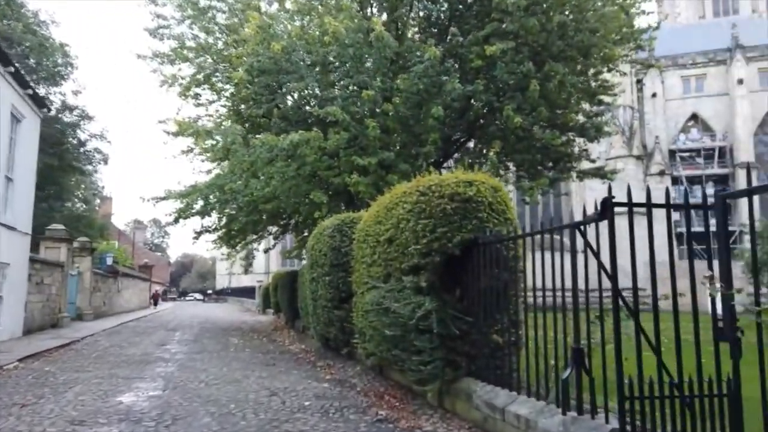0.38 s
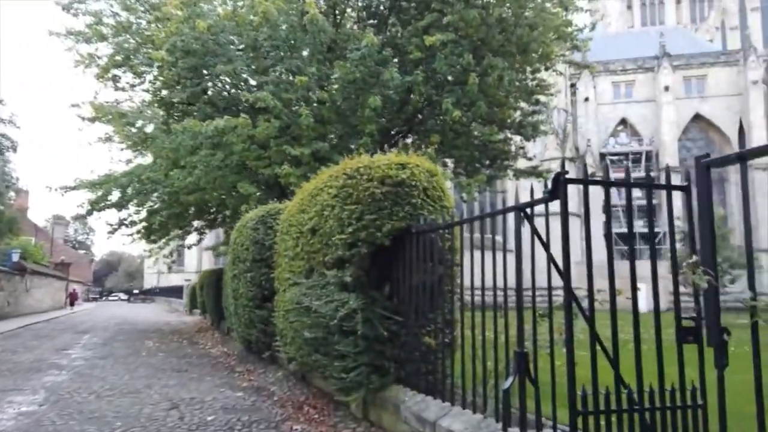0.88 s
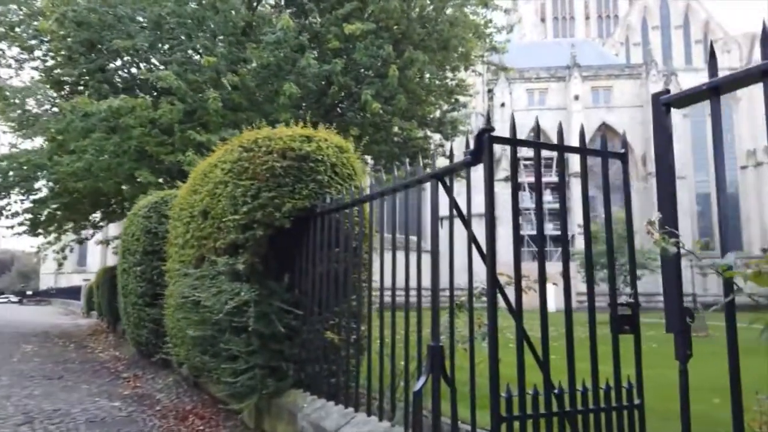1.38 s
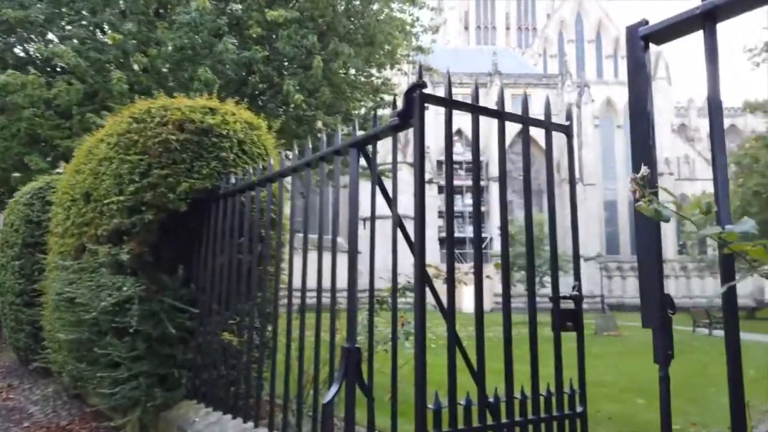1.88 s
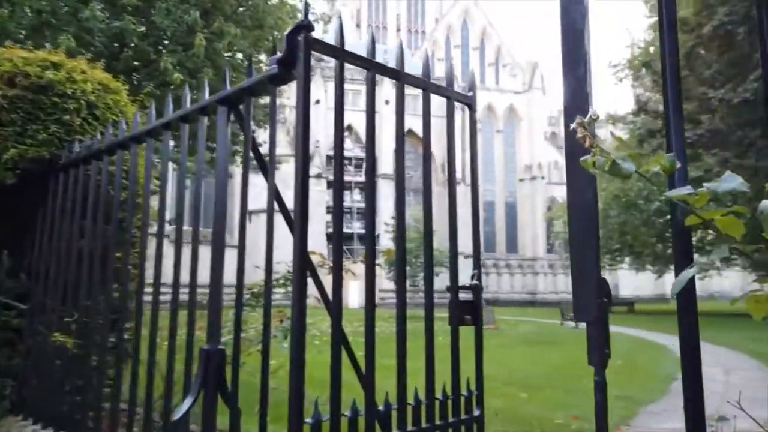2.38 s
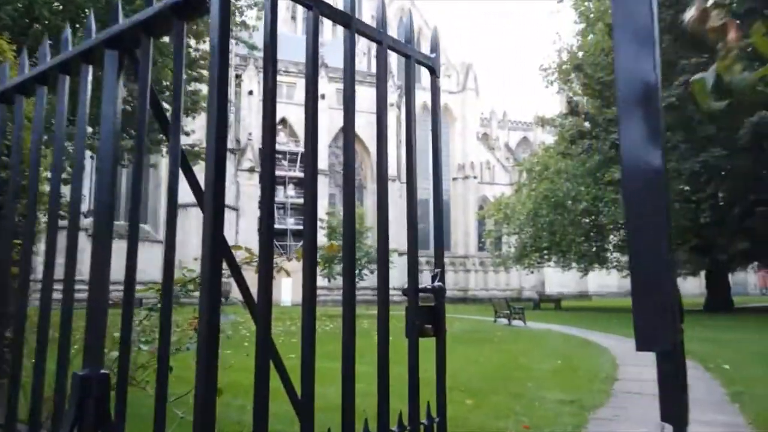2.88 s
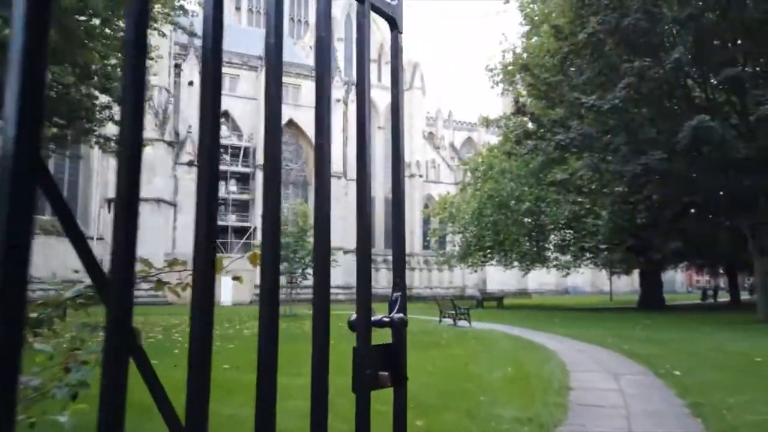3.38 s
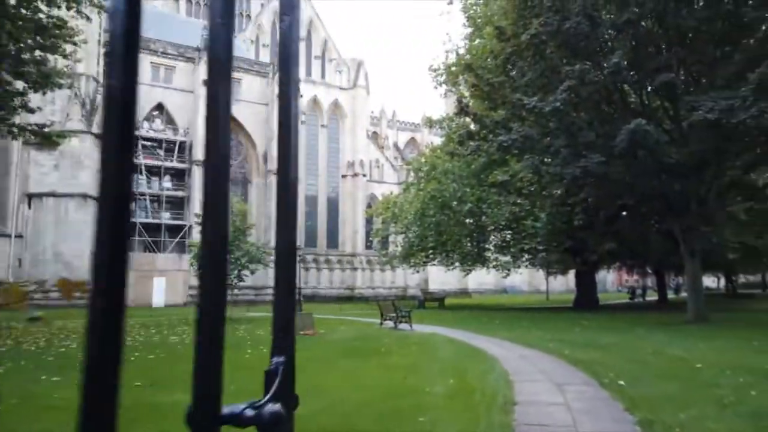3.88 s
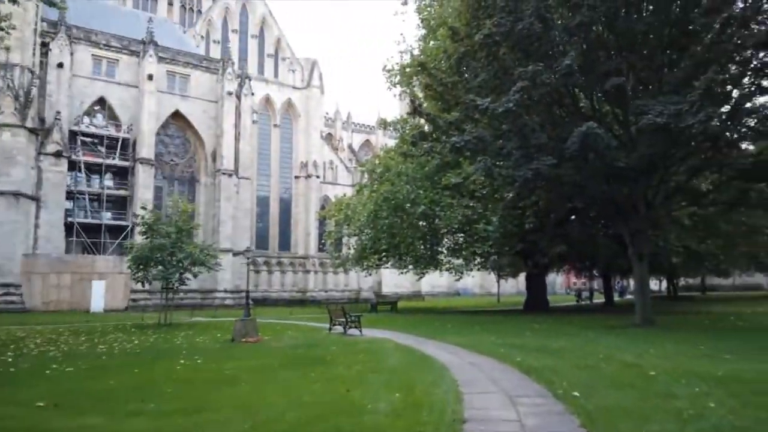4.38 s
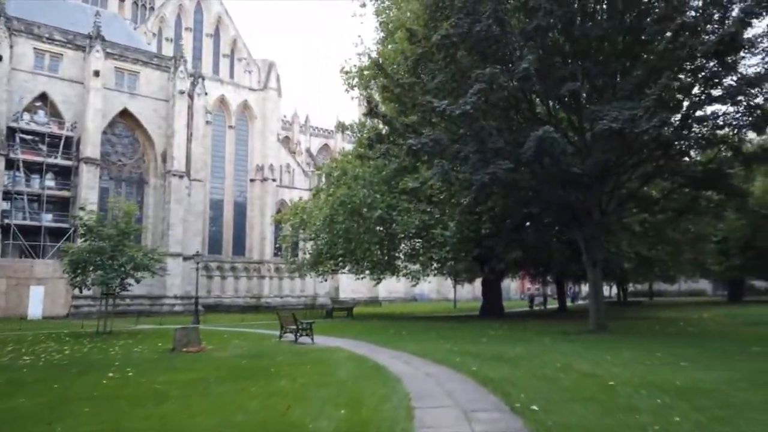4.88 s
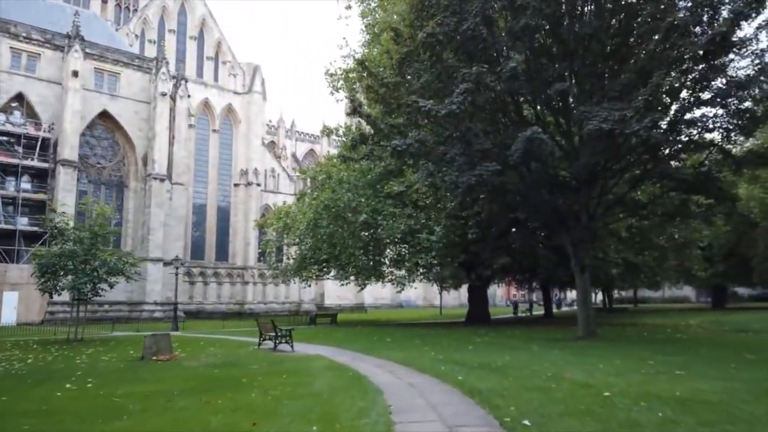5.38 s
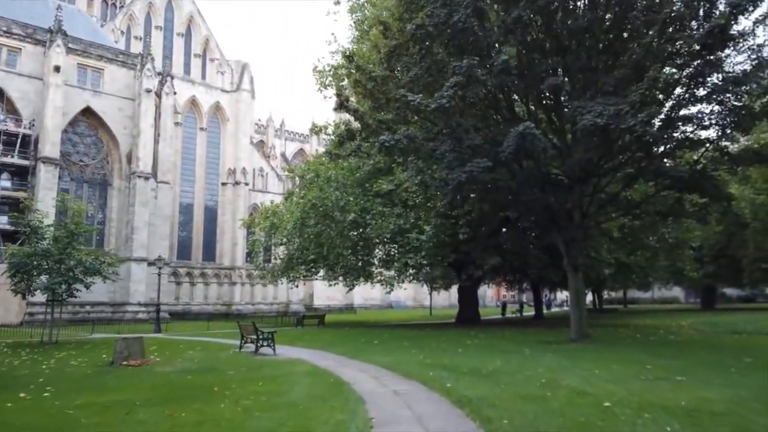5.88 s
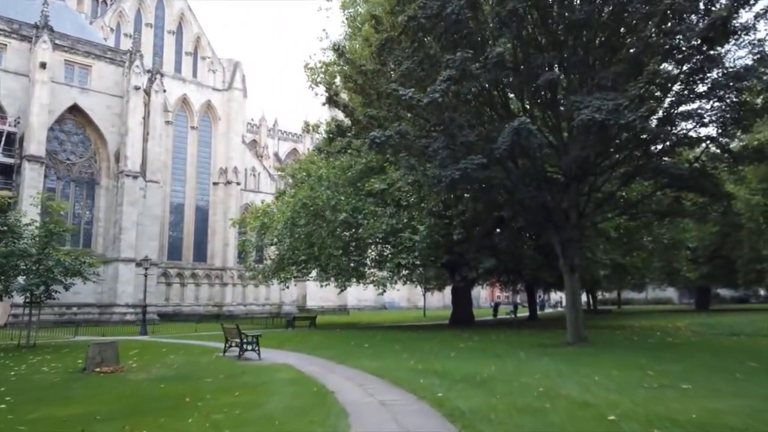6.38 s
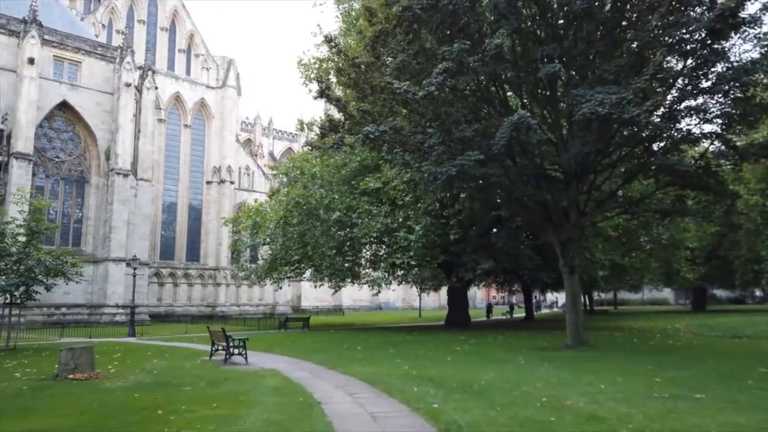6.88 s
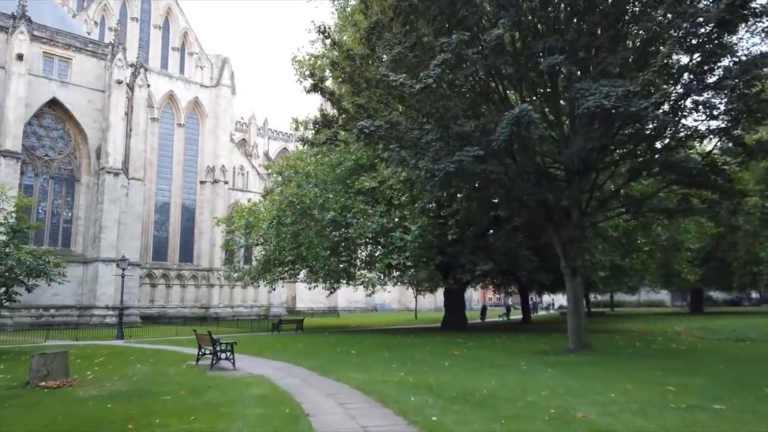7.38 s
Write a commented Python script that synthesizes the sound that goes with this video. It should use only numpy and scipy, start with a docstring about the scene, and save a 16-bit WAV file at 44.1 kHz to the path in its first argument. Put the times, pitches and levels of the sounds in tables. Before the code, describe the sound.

An open-air walk over cobbles and paving, heard from a small carried stereo microphone. Distant traffic and airy leaves lie underneath as soft broad noise, with a very faint low hum on the left. From 0 s wind puffs rumble deep and close, strongest around 0.1, 0.6 and 1 s. Small knocks and grit come at 0.1 s, then a loud dry double clack of the sole at 0.63-0.66 s with pebbly crunch, and a cluster of weaker knocks near 1.1 s. Lighter taps and scuffs follow around 1.65, 1.9, 2.4, 3.0 and 3.6 s while gusts weaken, dying near 4 s. A crisp gritty step falls at 4.3 s, leaves rustle softly around 4.8 s, and faint steps come at 5.4, 5.95 and 6.6 s. One low thump of air swings at 6.37 s. Traffic swells from 6.8 s, peaking about 7.2 s with the last soft footfall.

```python
"""Someone walks over cobbles and paving slabs carrying a small stereo microphone.
Shaped noise makes far traffic and leaves throughout, with a faint narrow hum on the left.
At first gusts rumble on the microphone and decaying modes ring the hardest knocks of the soles on stone.
Lighter steps follow, with scuffs built from random grains; the gusts die down near four seconds.
Then leaves rustle softly, one low swing thumps in the calm, and traffic swells as the last sole lands."""
import sys
import numpy as np
from scipy import signal
from scipy.fft import rfft, irfft
from scipy.io import wavfile
from scipy.ndimage import uniform_filter1d

SR = 44100
rng = np.random.default_rng(int(sys.argv[2]) if len(sys.argv) > 2 else 0)


def invert_db(level):
    """Linear amplitude ratio for a level in decibels (20 dB per decade), elementwise."""
    return 10 ** (np.asarray(level, dtype=float) / 20)


def int16_out(signal):
    """Quantize to a 16-bit WAV file."""
    q = np.round(np.clip(np.atleast_2d(signal).T, -1, 1) * 32767)
    wavfile.write(sys.argv[1], SR, q.astype(np.int16))


N = 331191


def rms_one(x):
    """Scale to rms 1."""
    return x / np.sqrt(np.mean(x ** 2) + 1e-20)


def in_time(rows):
    """Columns of a time table, drawn as straight lines with one value a sample."""
    s, *columns = np.transpose(rows)
    return [np.interp(np.arange(N) / SR, s, c) for c in columns]


def at_hz(points, hz):
    """Read a spectrum on a log-frequency axis."""
    point_hz, value = np.transpose(points)
    return np.interp(np.log(hz), np.log(point_hz), value)


def drift(corner_hz):
    """Slow random wander of rms 1: noise through two equal low-pass poles, drawn every 40 samples."""
    r = np.exp(-80 * np.pi * corner_hz / SR)
    noise = rng.standard_normal(N // 40 + 2002)
    slow = signal.lfilter([1], [1, -2 * r, r * r], noise)[2000:]   # leaves out the filter's start
    return np.interp(np.arange(N) / 40, np.arange(len(slow)), rms_one(slow))


def coloured(x, spectrum):
    """Give white noise a spectrum; rms 1."""
    hz = np.maximum(np.arange(N // 2 + 1) * SR / N, 1)
    return rms_one(irfft(rfft(x) * invert_db(at_hz(spectrum, hz)), N))


def band(x, edges_hz):
    """Causal band-pass with steep edges."""
    sos = signal.butter(3, np.clip(edges_hz, 20, 19000), "band", fs=SR, output="sos")
    return signal.sosfilt(sos, x)


def pan(db):
    """Left and right gains for a level difference; positive leans left."""
    return np.array([invert_db(db / 2), invert_db(-db / 2)])


def swells(rows, rise_share, squareness=2.04):
    """Layer gains from rows of (peak s, fall s, dB, ..); squareness 2 is a bell, more is flat-topped."""
    t = np.arange(N) / SR
    levels = np.zeros((len(rows[0]) - 2, N))
    for s, fall, *layers_db in rows:
        near = slice(max(int((s - .4) * SR), 0), int((s + .4) * SR))
        width = np.where(t[near] < s, rise_share, 1) * max(fall, .002)
        shape = np.exp(-np.abs((t[near] - s) / width) ** squareness)
        levels[:, near] += invert_db(np.array(layers_db))[:, None] * shape
    return levels


def wide_noise():
    """White stereo noise whose left-right likeness depends on pitch, by the balance of mid and side."""
    # likeness of the two channels, 1 alike to -1 opposed: (frequency [Hz], likeness)
    likeness = [(60, -0.61), (180, 0.1), (550, 0.49), (1650, 0.53), (4970, 0.21), (15000, -0.55)]
    mid, side = rfft(rng.standard_normal((2, N)))
    hz = np.maximum(np.arange(len(mid)) * SR / N, 1)
    alike = np.clip(at_hz(likeness, hz), -1, 1)
    return irfft(np.sqrt(1 + alike) * mid + np.sqrt(1 - alike) * side * [[1], [-1]], N)


def surroundings():
    """Far traffic and leaves breathe slowly as broad noise; a narrow band of noise hums on the left."""
    # far traffic, hidden by the hedge and walls by turns: (time [s], level [dB])
    air = [(0.0, -48), (0.2, -50), (0.98, -48.5), (1.29, -54), (3.0, -55.5), (4.9, -56), (5.1, -57),
           (6.3, -55), (6.8, -52.5), (7.0, -49), (7.19, -47), (7.51, -49.5)]
    # colour of the traffic: (frequency [Hz], relative density [dB per Hz])
    traffic_spectrum = [(71, -17), (120, 1), (189, -4), (254, -2.5), (332, -9.5), (575, -13), (997, -9.5),
                        (3500, -38), (4550, -41), (7700, -120)]
    # colour of the leaves: (frequency [Hz], relative density [dB per Hz])
    leaf_spectrum = [(1060, -9.5), (1800, -5.5), (2470, -10), (6740, -18), (11300, -21.5), (15100, -25.5),
                     (15600, -24)]
    hum_hz, hum_width_hz = 245.5, 32.3

    traffic_db, = in_time(air)
    rise_db = traffic_db + 55   # over quiet air at -55 dB
    traffic = coloured(wide_noise(), traffic_spectrum) * invert_db(traffic_db + 0.77 * drift(1.06))

    # leaves follow the traffic almost fully, the hum about a third of the way in dB
    leaves_db = -67 + 0.98 * rise_db + 1.5 * drift(14)
    leaves = coloured(wide_noise(), leaf_spectrum) * invert_db(leaves_db)
    hum_db = -66 + 0.36 * rise_db + 3 * drift(2)
    hum = band(rng.standard_normal(N), [hum_hz - hum_width_hz / 2, hum_hz + hum_width_hz / 2])
    hum = rms_one(hum) * invert_db(hum_db)
    return traffic * pan(0.91)[:, None] + leaves + hum * pan(14.0)[:, None]


def wind():
    """Turbulence pushes both ports nearly alike; wind and puffs set the size of each slow swing."""
    # colour of the deep rumble: (frequency [Hz], relative density [dB per Hz])
    rumble = [(12, -43), (20, -7.5), (49, 5), (64, 4), (90, -8.5), (120, -36), (200, -120)]
    # colour of the higher flutter: (frequency [Hz], relative density [dB per Hz])
    flutter = [(41, -25), (70, -1.5), (106, -6.5), (151, -16.5), (296, -33), (450, -43), (580, -46.5),
               (990, -120)]
    # strength of the wind between puffs, before the layer offsets: (time [s], level [dB])
    wind_strength = [(0.0, -46), (0.12, -29.5), (0.42, -35), (0.62, -21), (0.8, -30), (1.05, -26),
                     (1.3, -38), (1.65, -40.5), (1.9, -35.5), (2.15, -39.5), (2.65, -33), (3.0, -39.5),
                     (3.3, -33), (3.8, -37.5), (4.0, -52), (4.37, -49.5), (4.75, -58), (6.3, -57),
                     (6.75, -61.5), (7.34, -46), (7.51, -48)]
    # single puffs, strong and faint, as they drive the rumble:
    # (peak time [s], half length to 1/e [s], level [dB])
    puffs = [(0.06, 0.023, -19), (0.19, 0.017, -46), (0.35, 0.024, -29), (0.54, 0.036, -21),
             (0.66, 0.029, -26), (0.9, .1, -28), (1.05, 0.1, -23), (1.3, 0.032, -29.5), (1.53, 0.02, -26.5),
             (2.02, 0.019, -32.5), (2.35, 0.17, -37.5), (2.9, 0.038, -33.5), (3.15, 0.06, -33),
             (3.27, 0.024, -30), (3.47, 0.053, -26.5), (3.69, 0.058, -33), (3.97, 0.2, -41),
             (4.29, 0.053, -37)]

    wind_db, = in_time(wind_strength)
    steady = invert_db(wind_db + np.array([[2.5], [-1.5]]))              # rumble, flutter
    gusts = swells(puffs, 1) * invert_db(np.array([[0], [-18.5]]))       # puffs drive mostly the rumble
    out = 0
    for level, spectrum, evenness, side_db in zip(steady + gusts, (rumble, flutter), (.6, .4), (-28, -20)):
        mid, side = (coloured(rng.standard_normal(N), spectrum) for _ in "ms")
        # partly level out the noise's own swings
        swing = np.sqrt(uniform_filter1d(mid ** 2, size=2600) + 0.018)
        mid = rms_one(mid / swing ** evenness)
        out = out + level * (mid + invert_db(side_db) * side * [[1], [-1]])
    return out * pan(-0.25)[:, None]


def thump():
    """One lone puff of air gives a brief low swing in the calm: a cosine under a bell."""
    thump_s, thump_hz, bell_db = 6.366, 66.5, -33.5
    t = np.arange(N) / SR - thump_s
    bell = np.exp(-(t / .016) ** 2)
    return -invert_db(bell_db) * np.cos(2 * np.pi * thump_hz * (t + 0.0061)) * bell


def random_clicks(per_s, spread_db):
    """Two independent trains of chance clicks; spread_db makes some stronger."""
    strength = invert_db(spread_db * np.minimum(rng.exponential(1, (2, N)), 5))
    return (rng.random((2, N)) < per_s / SR) * strength


def grains(per_s, spread_db, spectrum, apart):
    """Dense clicks of either sign and one colour, partly different at the two ports."""
    clicks = random_clicks(per_s, spread_db)
    mid, side = coloured(clicks * rng.choice([-1, 1], (2, N)), spectrum)
    return rms_one(mid + apart * side * [[1], [-1]])


def ringing_grit(per_s, spread_db, cycles, apart):
    """Each coarse grain rings at one of twelve pitches, falling 60 dB in the given cycles."""
    low_hz, high_hz = 1930, 3800
    clicks = random_clicks(per_s, spread_db)
    dealt = rng.integers(0, 12, (2, N))
    out = 0
    for k, hz in enumerate(np.geomspace(low_hz, high_hz, 12)):
        r, w = invert_db(-60 * hz / (cycles * SR)), 2 * np.pi * hz / SR
        resonator = [1, -2 * r * np.cos(w), r * r]
        out = out + signal.lfilter([1, 0, -1], resonator, clicks * (dealt == k) + 1e-18)
    mid, side = band(out, [0.7 * low_hz, 1.2 * high_hz])
    return rms_one(mid + apart * side * [[1], [-1]])


def scuffs():
    """Pebbles rattle low, coarse grit crackles, fine sand hisses; one wide swell is a rustle of leaves."""
    # a landing sole crushes grit, which starts fast and dies slowly, levels before panning:
    # (peak time [s], fall to 1/e [s], pebbles [dB], coarse grit [dB], fine sand [dB])
    crunches = [(.065, 0.018, -81, -55, -60.5), (.14, .053, -60.5, -65, -74), (.585, 0.12, -48, -57, -65.5),
                (.671, 0.059, -50, -57.5, -62), (1.652, 0.021, -59, -58, -62.5),
                (2.371, 0.016, -51, -53.5, -80), (2.66, 0.027, -76, -63, -97),
                (3.63, 0.051, -58.5, -79, -82), (5.921, 0.011, -52.5, -54, -85)]
    # mostly a sole dragging over grit; the wide row at 4.8 s is a soft rustle of leaves.
    # All swell and fade evenly, levels before panning:
    # (peak time [s], half length to 1/e [s], pebbles [dB], coarse grit [dB], fine sand [dB])
    drags_and_rustle = [(1.099, 0.015, -50.5, -59.5, -59.5), (1.122, .096, -57, -63, -66),
                        (1.876, .025, -59.5, -60.5, -57), (2.54, 0.013, -70, -72, -68),
                        (2.995, .016, -58, -65.5, -63), (3.13, 0.059, -68, -64.5, -64),
                        (3.25, 0.062, -78, -67, -58), (3.34, 0.042, -85, -68, -68),
                        (3.715, 0.055, -77, -63.5, -64.5), (3.913, 0.018, -66, -66, -84),
                        (4.296, 0.055, -59.5, -54, -60), (4.85, 0.038, -61, -87, -96),
                        (4.8, 0.26, -68, -77, -74.5), (4.98, 0.038, -72, -69, -75),
                        (5.425, 0.034, -62.5, -73, -85), (5.95, 0.032, -59, -55.5, -75),
                        (5.968, .013, -51, -72, -85), (6.577, 0.04, -57, -66, -76),
                        (6.933, 0.025, -59, -62, -93)]
    # colour of the pebbles: (frequency [Hz], relative density [dB per Hz])
    pebble_spectrum = [(300, -3), (550, -2.5), (1000, 0), (1500, -1), (2400, -33.5)]
    # colour of the fine sand: (frequency [Hz], relative density [dB per Hz])
    sand_spectrum = [(3500, -13), (5200, -6), (7000, -12), (9800, -4), (12000, -12), (15500, -24.5)]

    levels = swells(crunches, rise_share=.28) + swells(drags_and_rustle, rise_share=1, squareness=3.1)
    pebbles = grains(2200, spread_db=3.0, spectrum=pebble_spectrum, apart=0.45) * pan(-6.0)[:, None]
    grit = ringing_grit(4500, spread_db=4.0, cycles=16.0, apart=0.87) * pan(-1.5)[:, None]
    sand = grains(6000, spread_db=0.0, spectrum=sand_spectrum, apart=1.06) * pan(2.8)[:, None]
    return levels[0] * pebbles + levels[1] * grit + levels[2] * sand


def struck(modes, t, contact_s):
    """Decaying modes set off by a soft push with time constant contact_s; peak 1."""
    ring = sum(-invert_db(db - 60 * t / t60) * np.sin(2 * np.pi * hz * t) for hz, db, t60 in modes)
    ring = ring * (1 - np.exp(-t / contact_s)) ** 3
    return ring / np.abs(ring).max()


def knocks():
    """Each contact rings the sole for a few cycles, ticks on the stone and rebounds once."""
    # sole meets stone, levels before panning:
    # (time [s], sharp knock peak [dB], dull thud peak [dB], bright tick [dB])
    contacts = [(0.092, -35, -30, -55), (0.123, -35, -34, -61), (0.135, -32, -57, -51),
                (0.575, -32, -39, -54), (0.626, -17, -25.5, -51), (0.664, -8.5, -22, -45),
                (0.897, -39.5, -60, -61), (1.017, -40, -42, -67), (1.043, -37, -33, -62),
                (1.071, -54, -55, -54), (1.086, -33, -31, -71), (1.093, -28.5, -38, -58),
                (1.106, -40, -27.5, -48.5), (1.21, -59, -58, -61), (1.24, -52, -58, -58),
                (1.649, -40, -27, -50.5), (1.744, -43.5, -47, -58), (1.768, -43, -54, -59),
                (1.894, -43, -42, -67), (2.355, -44, -45, -74), (2.37, -39.5, -40, -77),
                (2.415, -50, -43, -63), (2.464, -47, -55, -59), (2.658, -49, -47, -73),
                (2.963, -39, -41.5, -63), (3.107, -34.5, -63, -47), (3.619, -40, -37.5, -83),
                (4.245, -36.5, -35.5, -70), (4.318, -45, -44, -65), (4.824, -50, -44, -70),
                (4.847, -58, -41, -73), (5.102, -53, -67, -74), (5.175, -58, -64, -64),
                (5.273, -50, -69, -49), (5.389, -59, -48, -55), (5.415, -56, -41.5, -74),
                (5.92, -39, -62, -73), (5.977, -64, -38, -66), (6.562, -46, -46, -75),
                (6.598, -40, -49, -66), (7.171, -36.5, -33.5, -76)]
    # sharp modes of sole and slab: (frequency [Hz], relative level [dB], 60 dB decay time [s])
    sharp_modes = [(595, -1, 0.0071), (1044, 10, 0.0078), (1204, -5, 0.011), (1884, -11.5, 0.0093)]
    # dull modes of sole and slab: (frequency [Hz], relative level [dB], 60 dB decay time [s])
    dull_modes = [(429, 5.7, 0.018), (598, 12, 0.011), (758, 1.5, 0.017)]

    out = np.zeros((2, N + SR))
    t = np.arange(SR // 20) / SR
    sharp = struck(sharp_modes, t, contact_s=0.0012)
    dull = struck(dull_modes, t, contact_s=0.00038)
    for s, sharp_db, dull_db, tick_db in contacts:
        hit = invert_db(sharp_db) * sharp + invert_db(dull_db) * dull
        tick = rms_one(band(rng.standard_normal(len(t)), [1700, 12000]))
        hit += invert_db(tick_db) * tick * np.exp(-t / 0.0018)
        hit += invert_db(-15) * np.interp(t - .0105, t, hit, left=0)   # rebound
        late = np.interp(t - .00015, t, hit, left=0)   # the left port is further from the feet
        i = round((s - .0008) * SR)   # the push begins just ahead of the listed time
        out[:, i:i + len(t)] += pan(-5)[:, None] * [late, hit]
    return out[:, :N]


def scene():
    """Everything that reaches the two ports."""
    return surroundings() + wind() + thump() + scuffs() + knocks()


def roll_off(x):
    """The treble ends steeply here."""
    return signal.sosfilt(signal.butter(12, 15770, fs=SR, output="sos"), x)


def record(dry):
    """The finished stereo mix as it is stored."""
    return roll_off(dry)


dry = scene()
out = record(dry)
int16_out(out)
```